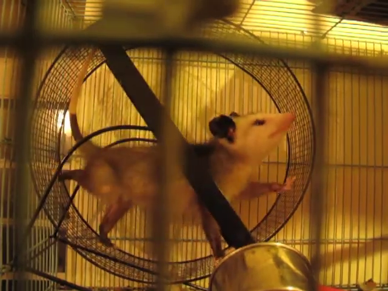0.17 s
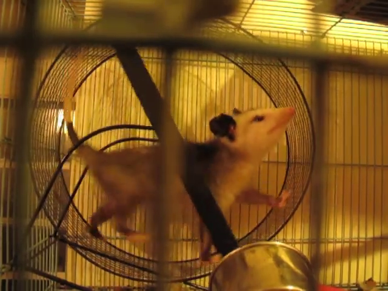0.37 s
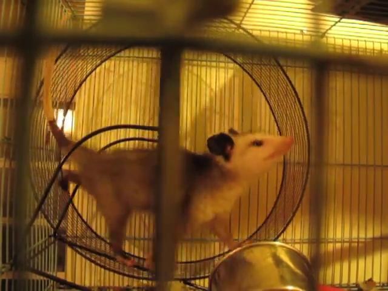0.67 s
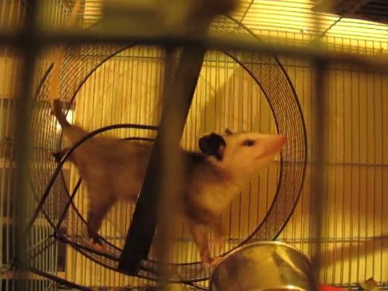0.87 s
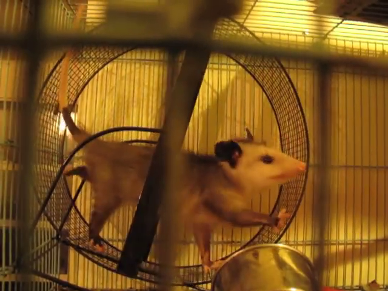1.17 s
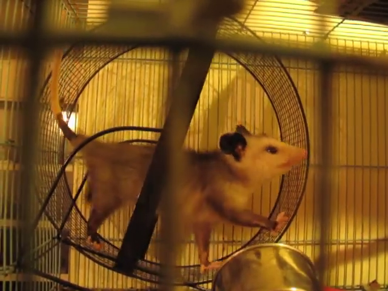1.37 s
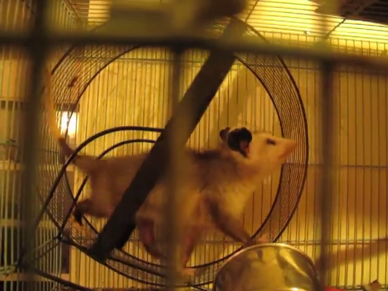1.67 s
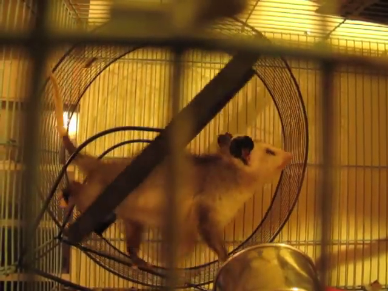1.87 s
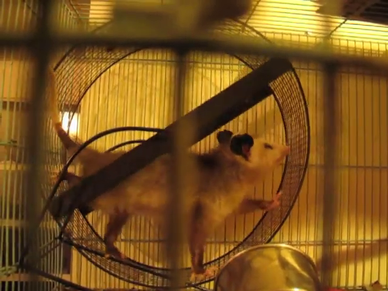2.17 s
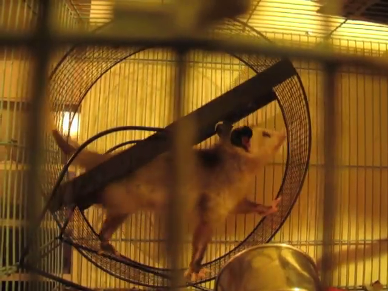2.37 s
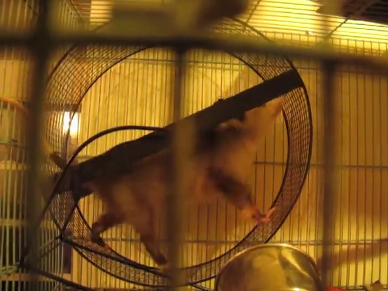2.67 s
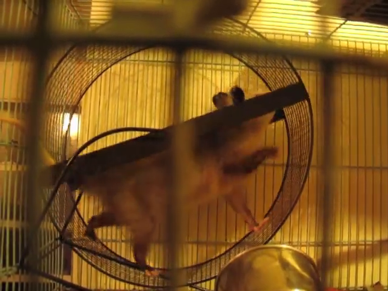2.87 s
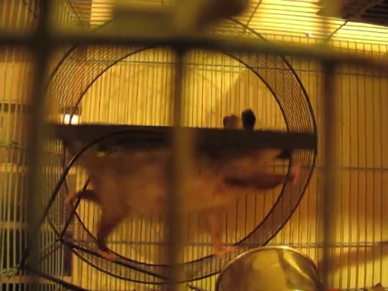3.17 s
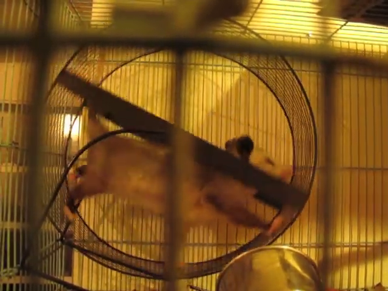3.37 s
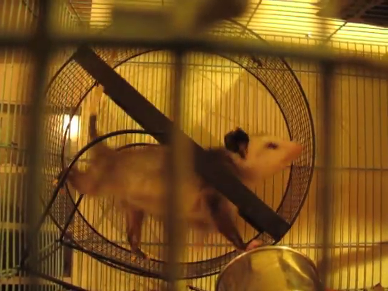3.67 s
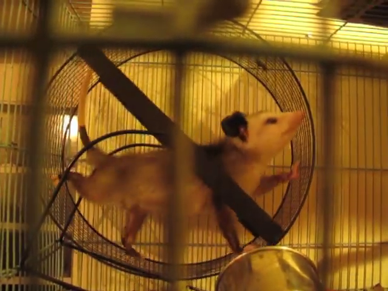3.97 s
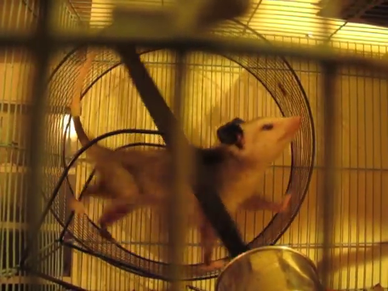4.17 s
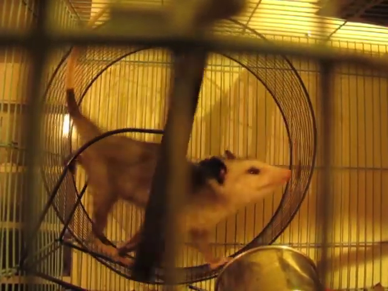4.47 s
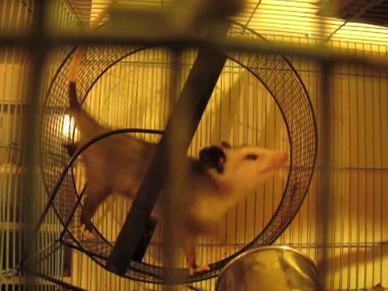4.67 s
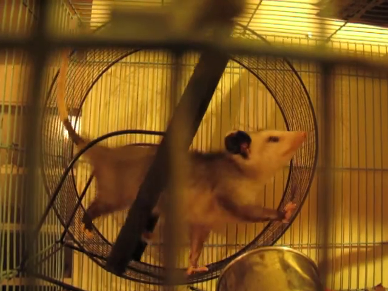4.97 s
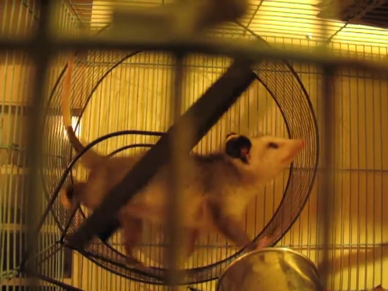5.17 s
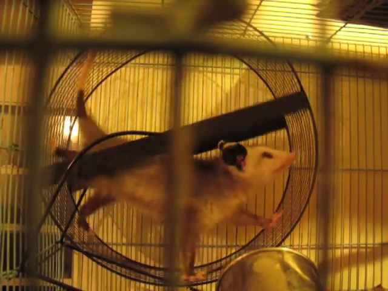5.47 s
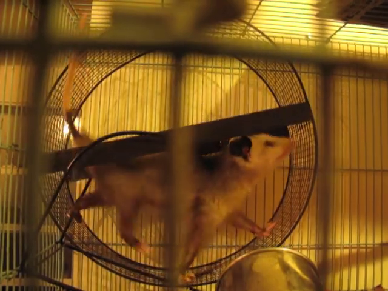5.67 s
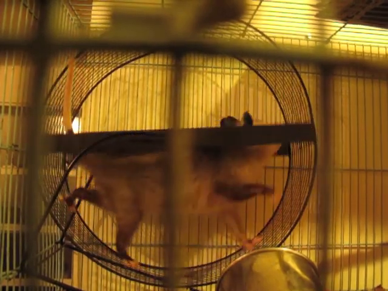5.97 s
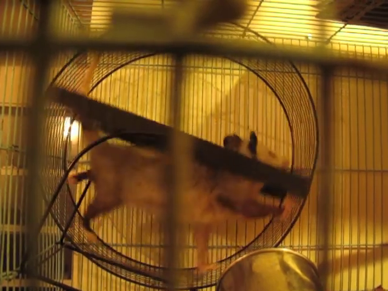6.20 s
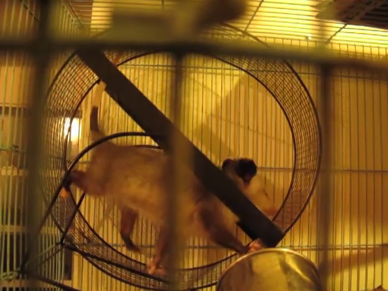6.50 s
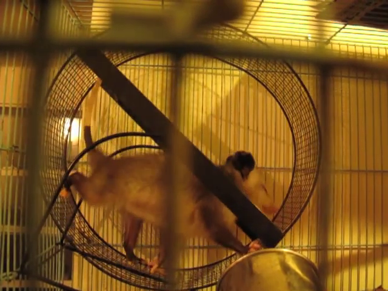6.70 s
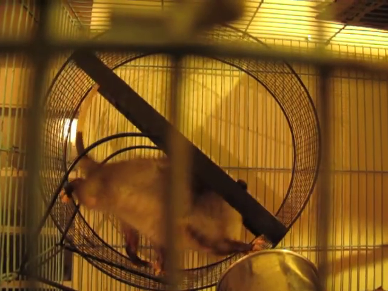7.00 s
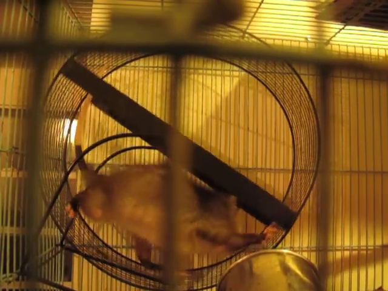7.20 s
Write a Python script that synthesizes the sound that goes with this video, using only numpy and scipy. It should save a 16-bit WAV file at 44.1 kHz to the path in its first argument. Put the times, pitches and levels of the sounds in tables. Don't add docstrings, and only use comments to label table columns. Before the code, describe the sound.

A quiet, close indoor sound of a small animal walking in a wire-mesh wheel, under soft hiss, dull rumble and a thin, slightly fluttering high electronic whine from a cheap camera microphone. At 0.2 s fur brushes the mesh with tiny claw ticks; metallic clicks and jolts follow at 0.5-0.85 s. Light taps quicken from 1.3 s, and from 1.6 to 2.15 s the loose hub chatters in rapid bright knocks. An airy swish passes at 2.3 s, then a hard ringing clank at 2.85 s. Small rattles come at 3.1-3.35 s. Around 4.15-4.5 s the frame rattles while the axle gives a short, falling squeak; a louder, purer high squeak sounds at 5.1-5.25 s. A thin bright knock lands at 5.45 s, soft bumps at 5.9 s, clustered ticks and muffled bumps at 6.15-6.6 s, then near quiet with faint clicks around 7.15 s.

```python
import sys
import numpy as np
from scipy import signal
from scipy.fft import rfft, irfft, next_fast_len
from scipy.io import wavfile
from scipy.ndimage import map_coordinates

SR = 44100
rng = np.random.default_rng(int(sys.argv[2]) if len(sys.argv) > 2 else 0)


def convert_level_to_amplitude(level_db):
    exponent = np.asarray(level_db, float) / 20
    return 10 ** exponent


def inscribe(sig):
    pcm = np.round(np.clip(np.atleast_2d(sig).T, -1, 1) * 32767)
    wavfile.write(sys.argv[1], SR, pcm.astype(np.int16))


N = 323692

# pitch_hz, width_hz, level_db
FRAME_MODES = [(1820, 32.1, -3), (2060, 41.14, -2), (2321.9, 23.16, -3.5), (2644.6, 79, -5),
               (3050, 85.15, -5), (3620.2, 18.4, -1.5), (3919.9, 54.48, -8), (4567, 19.87, -9),
               (4836.6, 69.7, -12), (5472.7, 98, -11), (6496.2, 26.93, -4), (10860, 30, -7.5)]
# pitch_hz, width_hz, level_db
MESH_MODES = [(5907.8, 90, 4.5), (8300, 19, -2), (8273, 52, -3.5), (8530, 46.4, 8), (8553.5, 112.8, 2.5),
              (9861, 57, 10.5), (10982, 40, -1.5)]
# time_s, level_db, octave_db
GLIDE_LEVELS = [(4.362, -85, -95.5), (4.3745, -43, -72), (4.3785, -53.5, -66.5), (4.383, -47, -64),
                (4.4, -57, -62.5), (4.455, -61, -69.5), (4.474, -47.5, -63.5), (4.495, -53, -62.5),
                (4.53, -76, -80)]


def unit(x):
    return x / np.sqrt(np.mean(x ** 2) + 1e-20)


def along(points, hz):
    f, v = np.transpose(points)
    return np.interp(np.log(hz + 1), np.log(f + 1), v)


def curves(rows):
    s, *cols = np.transpose(rows)
    return [np.interp(np.arange(N) / SR, s, c) for c in cols]


def wobble(rate_hz):
    knots = rng.standard_normal(int(N * rate_hz / SR) + 4)
    return map_coordinates(knots, [np.arange(N) * rate_hz / SR])


def filtered(x, response):
    m = next_fast_len(N + SR // 2)
    return irfft(rfft(x, m) * response(np.fft.rfftfreq(m, 1 / SR)), m)[:N]


def coloured(x, spectrum):
    return filtered(x, lambda hz: convert_level_to_amplitude(along(spectrum, hz)))


def modes(table):
    def response(f):
        total = 0
        for k, (hz, width, db) in enumerate(table):
            damping = 1j * f * width
            total = total + (-1) ** k * convert_level_to_amplitude(db) * damping / (hz * hz - f * f + damping)
        return total
    return response


def ring(t, hz, t60):
    return np.sin(2 * np.pi * hz * t) * convert_level_to_amplitude(-60 * t / t60)


def bell(t, center_s, half_width_s):
    return np.exp(-.5 * ((t - center_s) / half_width_s) ** 2)


def grit(rate_hz, spread_db, t60):
    sizes = (rng.random(N) < rate_hz / SR) * convert_level_to_amplitude(spread_db * rng.exponential(size=N))
    life = convert_level_to_amplitude(-60 * np.arange(SR // 20) / SR / t60)
    return unit(signal.fftconvolve(sizes, life)[:N] * rng.standard_normal(N))


def bursts(times_s, levels_db, t60, tail_db, tail_t60):
    hits, t = np.zeros(N), np.arange(SR // 5) / SR
    hits[np.round(times_s * SR).astype(int)] = convert_level_to_amplitude(levels_db)
    life = convert_level_to_amplitude(-60 * t / t60) + convert_level_to_amplitude(tail_db - 60 * t / tail_t60)
    return 0.593 * hits + signal.fftconvolve(hits, life)[:N] * rng.standard_normal(N)


def gestures(rows, rest_db):
    t = np.arange(0, N / SR + .01, .002)
    s, db, rise, fall = np.transpose(rows)[:, :, None]
    drop_db = 10 * np.where(t < s, (s - t) / abs(rise), (t - s) / abs(fall))
    level_db = (db - drop_db).max(axis=0)
    return np.interp(np.arange(N) / SR, t, np.maximum(level_db, rest_db))


def ringing_parts(rows, puff_share):
    out, t = np.zeros(N + SR), np.arange(SR // 3) / SR
    onset = 1 - np.exp(-t / 0.000555)
    for s, db, hz, t60 in rows:
        puff = rng.standard_normal(len(t)) * convert_level_to_amplitude(-60 * t / t60)
        body = signal.lfilter(*signal.iirpeak(hz, 1.782 + hz / 1500, SR), puff)
        out[round(s * SR):][:len(t)] += convert_level_to_amplitude(db) * (ring(t, hz, t60) + puff_share * body) * onset
    return out[:N]


def air():
    # pitch_hz, level_db_per_hz
    hiss_spectrum = [(20, 1.5), (100, 0), (300, -3.5), (1000, -7.5), (2000, -11), (4000, -12),
                     (6000, -14.5), (8000, -15), (10500, -19.5), (12500, -23), (16000, -23)]
    return convert_level_to_amplitude(-67) * unit(coloured(rng.standard_normal(N), hiss_spectrum))


def whine():
    whine_hz, frame_rate_hz = 5880, 30
    t = np.arange(N) / SR
    since = (t * frame_rate_hz - 685 / 1470 + .5) % 1 - .5
    gap = bell(since, 0, 0.01578)
    slip_rad = -.6 * gap + 0.098 * ((since % 1) - .5) + 0.172 * bell(since, .055, 0.022)
    return convert_level_to_amplitude(-53.0) * (1 - 0.5726 * gap) * np.cos(2 * np.pi * whine_hz * t + slip_rad)


def rumble():
    # time_s, level_db
    rumble_levels = [(0.0, -66.5), (.69, -63.5), (1.53, -64), (1.94, -58.5), (2.33, -66), (2.72, -69),
                     (3.21, -66.5), (3.37, -61.5), (3.78, -72.5), (4.37, -61), (4.6, -67.5), (5.29, -73),
                     (5.54, -64.5), (5.7, -71), (6.13, -69), (6.4, -64.5), (6.6, -73), (7.34, -73)]
    # pitch_hz, level_db_per_hz
    stand_spectrum = [(40, -16.5), (150, -18.5), (400, -8.5), (700, -5), (1000, -1), (1300, -4), (1700, -9),
                      (2600, -14.5), (5000, -81)]
    level_db, = curves(rumble_levels)
    noise = unit(coloured(rng.standard_normal(N), stand_spectrum))
    return convert_level_to_amplitude(level_db - 1 + 1.0637 * wobble(20)) * noise


def scuffs():
    # peak_s, peak_db, rise_s_per_10db, fall_s_per_10db
    scuff_rows = [(.25, -68.5, -0.0862, 0.2419), (.4, -69.5, 0.5622, 0.0364), (.54, -64, 0.0992, 0.5821),
                  (1.45, -65.5, 0, 0.2621), (1.75, -59.5, 0.032, 0.0456), (1.88, -54, 0.079, 0.0351),
                  (1.935, -57, -0.1034, -0.0172), (2.0, -63, 0, 0.2224), (2.11, -59.5, -0.0689, 0.0051),
                  (2.87, -69, 0.36, 1), (3.15, -71, 0.6709, 0.0058), (3.31, -63.5, 0.06, 0.0108),
                  (3.34, -68, 0.8855, 0.3162), (4.2, -65, 0, 0.6359), (4.4, -58, 0.0884, -0.077),
                  (4.575, -61.5, .5, -0.0517), (5.155, -56, 0.0223, 0.0061), (5.26, -69.5, 0.7142, 0.2029),
                  (5.39, -55.5, 0.0007, 0.0046), (5.46, -53.5, -0.0314, 0.0097),
                  (6.23, -64, 0.5789, 0.2418), (6.4, -60, 0.072, 0.1177), (6.97, -71, 0.3988, 0.4649)]
    # pitch_hz, level_db_per_hz
    scuff_spectrum = [(2000, -57), (4000, -17), (6500, -7), (8000, -2), (9300, 1.5), (10800, -7.5),
                      (12500, -14), (16000, -28)]
    level_db = gestures(scuff_rows, rest_db=-76.5)
    grains = grit(700, spread_db=2.5, t60=0.03787)
    sound = unit(coloured(grains, scuff_spectrum)) + .5 * unit(filtered(grains, modes(MESH_MODES)))
    return convert_level_to_amplitude(level_db - 3.5) * sound


def turning_wheel():
    # peak_s, peak_db, rise_s_per_10db, fall_s_per_10db
    stride_rows = [(.2, -68, 0.8158, 0.269), (.55, -64, -1.4523, 0.5188), (1.2, -70.5, 5.5, 3),
                   (1.45, -67, -0.5, -0.9663), (1.75, -59, -0.0078, 0.22), (1.88, -58, -0.6961, 0.1423),
                   (2.0, -57, -0.003, 0.2584), (2.11, -55.5, 0.484, 0.1057), (2.9, -69, 0.67, 1.9985),
                   (3.24, -61, 0.0582, 0.15), (3.33, -59, 0.2149, 0.1627), (3.42, -61.5, 0.0729, 0.0211),
                   (4.15, -60, 0.0329, 0.624), (4.4, -61, 0.2859, 0.2267), (4.5, -59, .5, -0.2189),
                   (5.4, -64.5, 0.1423, 0.3164), (6.23, -66.5, 0.5931, 0.2459), (6.4, -61, 0.1344, 0.1129)]
    # pitch_hz, width_hz, level_db
    roll_modes = [(135.82, 29.96, -3), (245.33, 42.04, 1.5), (386.02, 37.58, -1.5)]
    level_db = gestures(stride_rows, rest_db=-78.5)
    shakes = convert_level_to_amplitude(level_db - 3.5) * grit(1500, spread_db=3.0, t60=0.046)
    rattle = convert_level_to_amplitude(14.5) * filtered(shakes, modes(FRAME_MODES))
    rattle += convert_level_to_amplitude(2.0) * coloured(shakes, [(500, -29), (900, -7), (1700, 3.5), (5000, -7.5), (8000, -21)])
    roll = convert_level_to_amplitude(level_db - 8) * unit(filtered(rng.standard_normal(N), modes(roll_modes)))
    return rattle + roll


def swishes():
    # peak_s, peak_db, rise_s_per_10db, fall_s_per_10db
    swish_rows = [(.122, -68, 0.15, 0.0762), (.185, -52.5, -0.0176, 0.0347), (.215, -58.5, -0.0214, 0.0211),
                  (1.2, -65.5, 0.0562, 0.2004), (2.27, -54, -0.0045, 0.0842), (2.3, -50, 0.0284, 0.0465),
                  (2.335, -54.5, 0.0193, 0.0269), (2.395, -67, -0.1034, 0.1587),
                  (3.22, -69.5, 0.1627, 0.1523), (3.288, -57, 0.0287, 0.0351), (4.05, -58.5, -0.019, 0.103),
                  (4.074, -54, -0.0161, 0.0369), (5.49, -58, 0.0307, 0.033), (6.188, -62.5, 0.0479, 0.0195),
                  (6.4, -67, 0.0503, 0.1165)]
    # pitch_hz, level_db_per_hz
    swish_spectrum = [(2500, -38.5), (4000, -13), (6500, -11), (9000, 2), (10800, -1.5), (12500, -9),
                      (14000, -13), (16000, -17.5)]
    # pitch_hz, width_hz, level_db
    swept_modes = [(7517, 61.26, -5.5), (8505, 50, 4), (10860, 35, -4), (12270, 50, -3.5),
                   (13460, 50, -13.5)]
    fur = grit(3000, spread_db=1.0, t60=.012)
    sound = unit(coloured(fur, swish_spectrum)) + 0.428 * unit(filtered(fur, modes(swept_modes)))
    return convert_level_to_amplitude(gestures(swish_rows, -110)) * sound


def claws():
    # start_s, peak_db, top_edge_db (re peak)
    claw_rows = [(.189, -53, -19), (.2119, -55, -22), (0.835, -58.5, -23.5), (1.1916, -60, -12),
                 (2.269, -49, -17.5), (2.296, -46, -19), (2.317, -52.5, -17.5), (2.3865, -62.5, -23),
                 (2.472, -58, -21.5), (2.7017, -59.5, -19), (2.7806, -60, -20), (2.8505, -39, -10),
                 (3.2129, -58, -20), (3.2834, -50.5, -20), (3.744, -58.5, -20), (4.0456, -59, -15.5),
                 (5.4458, -37, -22), (0.8479, -50.5, -25), (.524, -48.5, -25), (4.3536, -62, -14),
                 (4.3802, -55.5, -14), (4.5387, -60.5, -23.5), (4.555, -54, -24), (5.2421, -62, -17),
                 (5.3517, -52, -23), (5.733, -53, -17.5), (6.2319, -53, -24.5), (6.1437, -58.5, -23),
                 (6.2065, -57, -22), (6.333, -56, -21.5), (6.3671, -56.5, -24), (6.28, -62.5, -22),
                 (6.292, -61, -23), (6.304, -63.5, -23), (6.161, -61, -22), (7.1435, -55.5, -22),
                 (7.1977, -59.5, -17)]
    # pitch_hz, level_db_per_hz
    tick_spectrum = [(500, -38), (2500, -23.5), (5000, 0.5), (7000, 1), (9000, 1.5), (10500, -0.5),
                     (12000, -5.5), (16000, -34.5)]
    s, db, top_db = np.transpose(claw_rows)
    crack = bursts(s, db, t60=0.02935, tail_db=-10.5, tail_t60=0.1767)
    edge = bursts(s, db + top_db, t60=0.023, tail_db=-20, tail_t60=.12)
    wire = coloured(crack, tick_spectrum) + convert_level_to_amplitude(1.0) * filtered(crack, modes(MESH_MODES))
    return wire + coloured(edge, [(10500, -36.5), (12200, 11.5), (14000, 3), (16000, -10)])


def jolts():
    # start_s, peak_db, dull_crack_db (re peak)
    jolt_rows = [(.5232, -42, -1.5), (0.5855, -38.5, -15.5), (.707, -52, 8), (0.7945, -53.5, 3),
                 (0.8477, -50, 8), (2.474, -47.5, 1.5), (2.8497, -32.5, 3), (3.079, -46.5, -1.1643),
                 (3.136, -48, -6), (3.2221, -59, -1.5), (3.252, -46, 0), (3.2908, -41, -2.5),
                 (3.348, -56, -7), (4.146, -48.5, -10), (4.2882, -43.5, -8.5), (4.339, -52.5, -3),
                 (4.351, -43, -3), (4.399, -41.5, -8), (4.4476, -41.5, -12), (4.49, -42.5, -2),
                 (4.8877, -45, -13.5), (5.3833, -50.5, -7.5), (5.445, -36.5, 2.5), (5.5446, -48.5, 2),
                 (5.862, -57, 7.5), (6.2546, -59.5, -0.5), (6.367, -57, -4), (6.3927, -50.5, 7.5),
                 (6.4009, -49.5, 4.5), (6.4489, -50.5, 3.5), (7.1471, -54, 4)]
    s, db, dull_db = np.transpose(jolt_rows)
    shake = bursts(s, db, t60=0.004275, tail_db=-17.5, tail_t60=0.21674)
    dull = bursts(s, db + dull_db, t60=0.02445, tail_db=1, tail_t60=0.15204)
    broad = coloured(dull, [(800, -16.5), (1700, -8.5), (5500, -7.5), (8500, -25.5)])
    return convert_level_to_amplitude(-5) * broad + convert_level_to_amplitude(13) * filtered(shake, modes(FRAME_MODES))


def paw_bumps():
    # start_s, peak_db, pitch_hz, t60_s
    bump_rows = [(.523, -60, 3050, 0.0937), (.584, -59.5, 2340, 0.177), (.584, -63.5, 2050, 0.0461),
                 (.796, -60.5, 1426, 0.0844), (1.578, -56.5, 1433, 0.0643), (1.994, -52.5, 1113, 0.1284),
                 (6.275, -63, 2159, 0.087), (3.177, -65.5, 1680, 0.0813), (3.218, -59, 2306, 0.0734),
                 (3.254, -54, 1527, 0.04626), (3.29, -59, 1551, 0.188), (4.143, -58.5, 2060, 0.1945),
                 (4.215, -58, 1441, 0.242), (5.352, -56.5, 1439, 0.1622), (5.352, -59, 3410, 0.1621),
                 (5.365, -58, 770.3, 0.407), (5.383, -56, 1321, 0.1199), (5.383, -55.5, 2240, 0.1341),
                 (5.383, -57.5, 3420, 0.1002), (5.862, -53.5, 900, 0.1088), (5.862, -56.5, 580.1, 0.1388),
                 (5.86, -64, 1592, 0.0826), (6.255, -55, 2060, 0.0815), (6.25, -58.5, 712.1, 0.1467),
                 (6.249, -60.5, 1175, 0.0902), (6.366, -58, 574.4, 0.238), (6.366, -57, 818.7, 0.1162),
                 (6.386, -52.5, 599.2, 0.132), (6.411, -53.5, 1020, 0.167), (6.537, -59.5, 577.9, 0.1106), ]
    return ringing_parts(bump_rows, puff_share=3.941)


def frame_rings():
    # start_s, peak_db, pitch_hz, t60_s
    ring_rows = [(.524, -62.5, 2572, 0.0773), (.53, -62, 1877, 0.1249), (.524, -65, 10860, 0.147),
                 (.586, -61.5, 10860, 0.1936), (.586, -55.5, 3040, 0.1156), (.645, -60, 2502, 0.1018),
                 (.645, -63.5, 1903, 0.0985), (3.075, -61, 3507, 0.1002), (3.29, -54.5, 10860, 0.1428),
                 (3.33, -60, 1508, 0.0767), (4.138, -59.5, 751, .1), (4.162, -59.5, 3482, 0.134),
                 (4.168, -60.5, 1558, 0.1013), (4.205, -60.5, 2563, 0.1307), (4.287, -56, 3040, 0.1064),
                 (4.287, -59, 1820, 0.0908), (4.285, -62.5, 4152, 0.068), (4.34, -60, 1820, 0.14),
                 (4.357, -65.5, 3653, 0.1385), (4.4, -59, 2757, 0.1131), (4.445, -62.5, 2550, 0.0763),
                 (4.492, -61.5, 3040, 0.0986), (4.49, -55.5, 1820, 0.1212), (4.565, -62.5, 3040, 0.0946),
                 (5.878, -57.5, 1314, 0.0785), (5.885, -60.5, 397.4, 0.1052), (5.897, -55.5, 578.2, 0.1067),
                 (5.915, -63, 1524, 0.0738), (6.165, -61.5, 1443, 0.0999), (6.25, -61, 1750, 0.0589),
                 (6.252, -64, 2647, 0.0598), (6.335, -66, 1394, 0.065), (6.445, -59, 1449, 0.0959),
                 (6.503, -62, 1002, 0.0698), (6.57, -62, 1101, 0.1169)]
    return ringing_parts(ring_rows, puff_share=1.364)


def claw_taps():
    # start_s, peak_db
    tap_rows = [(0.5839, -49), (.756, -53), (1.296, -54), (1.445, -49.5), (1.5169, -54.5), (1.577, -50.5),
                (1.6305, -51.5), (1.6795, -51.5), (1.932, -53), (2.213, -45.5), (3.0333, -54), (3.146, -50),
                (3.2313, -49.5), (4.1589, -44.5), (4.4865, -54), (5.2638, -52), (5.3816, -46), (1.807, -55),
                (1.889, -47.5), (1.601, -52.5), (1.619, -58), (5.5456, -54), (5.5769, -53), (5.7983, -55),
                (6.0638, -57), (6.2556, -51.5), (6.3372, -53), (6.391, -54), (6.4, -47), (6.449, -48.5)]
    # pitch_hz, level_db_per_hz
    tap_spectrum = [(3000, -41), (6500, -8), (8000, 1), (9500, 3.5), (10800, -8.5), (12000, -17.5),
                    (16000, -39.5)]
    tips = bursts(*np.transpose(tap_rows), t60=0.02341, tail_db=-12, tail_t60=0.1337)
    return coloured(tips, tap_spectrum) + convert_level_to_amplitude(-2.5) * filtered(tips, modes(MESH_MODES))


def chatter():
    # start_s, frame_peak_db, mesh_peak_db
    chatter_rows = [(1.6, -46, -60), (1.6506, -40, -56.5), (1.694, -37, -60), (1.724, -39.5, -47),
                    (1.768, -39, -50), (1.784, -39, -49), (1.826, -36.5, -44.5), (1.867, -34, -39.5),
                    (1.9122, -43.5, -48), (1.966, -44.5, -53), (1.9781, -38.5, -48.5), (1.9914, -33.5, -43),
                    (2.016, -42, -54), (2.0499, -36.5, -52.5), (2.0873, -31, -38.5), (2.118, -43, -58),
                    (2.151, -46.5, -64.5)]
    # pitch_hz, width_hz, level_db
    hub_modes = [(1820, 52.1, -4), (2050, 62.84, -5.5), (2666.2, 84.5, -7), (3040, 57.1, 1.5),
                 (3646.5, 24.22, 0.5), (3904.2, 43.7, -3.5), (4540.8, 38.15, -2.5), (4975.6, 84.8, -3),
                 (6429.9, 45.9, -0.5), (7440, 48.6, -5.5), (8749.7, 45, -5.5), (9175, 60, -5),
                 (10254, 50, -13), (10861, 29.95, 1)]
    # pitch_hz, level_db_per_hz
    thud_spectrum = [(700, -29.5), (1500, -4), (3000, -4), (5500, 1), (7500, -20.5)]
    # pitch_hz, level_db_per_hz
    clatter_spectrum = [(1200, -39.5), (2500, -17.5), (5000, -6.5), (7000, -3.5), (9200, 0.5), (10800, -3),
                        (12500, -16), (16000, -27.5)]
    mesh_lag_s = .0004
    s, frame_db, mesh_db = np.transpose(chatter_rows)
    knock = bursts(s, frame_db, t60=0.00642, tail_db=-17.5, tail_t60=0.1591)
    thud = bursts(s, frame_db, t60=0.0405, tail_db=-6, tail_t60=0.166)
    hiss = bursts(s + mesh_lag_s, mesh_db, t60=0.0415, tail_db=-10, tail_t60=0.1693)
    out = convert_level_to_amplitude(10.0) * filtered(knock, modes(hub_modes))
    out += convert_level_to_amplitude(-16.5) * coloured(thud, thud_spectrum)
    return out + convert_level_to_amplitude(-1.5) * coloured(hiss, clatter_spectrum)


def hard_knocks():
    # (pitch_hz, level_db, t60_s)
    knock_rows = [
        (2.8501, -44.5, [(609.5, -13.5, 0.1706), (1233, -5.5, 0.1538), (1822, -1, 0.0837), (2276, 0.5, 0.0411), (2766, -8.5, 0.137), (3870, -16, 0.1202), (4861, 0, 0.0596), (6007, 4, 0.0599), (6555, -6.5, 0.1691), (8208, -11.5, 0.0987), (10860, 5.5, 0.12675)]),
        (5.4461, -50, [(2319, 0.5, 0.04566), (2777, -14.5, 0.415), (3766, -1, 0.0578), (4584, 7.5, 0.02832), (4910, -12, .08), (6517, -9, 0.3745), (8246, -9, 0.0614), (10860, 1.5, 0.2035), (11080, 16, 0.02998), (12100, -6, .05), (12760, -4.5, 0.0603)]),
    ]
    out, t = np.zeros(N + SR), np.arange(SR // 3) / SR
    for s, db, table in knock_rows:
        struck = sum(convert_level_to_amplitude(level) * ring(t, hz, t60) for hz, level, t60 in table)
        out[round(s * SR):][:len(t)] += convert_level_to_amplitude(db) * struck
    return out[:N]


def gliding_squeak():
    # time_s, slip_rate_hz
    glide_pitch = [(4.365, 6930), (4.383, 7150), (4.397, 6780), (4.408, 6560), (4.435, 6420), (4.452, 6150),
                   (4.466, 5800), (4.49, 5600), (4.54, 5520)]
    # peak_s, peak_db, pitch_hz, half_width_s
    axle_rows = [(4.392, -51.5, 7110, 0.00706), (4.408, -55, 6560, .012), (4.405, -48.5, 6327, 0.00842),
                 (4.424, -44, 6327, 0.01455), (4.455, -55.5, 6327, 0.0112), (4.449, -48.5, 6062, 0.00712),
                 (4.504, -52, 5605, 0.00915), (4.498, -55.5, 5366.4, 0.0099), (4.534, -58, 5605, 0.00609)]
    t = np.arange(N) / SR
    (hz,), (db, octave_db) = curves(glide_pitch), curves(GLIDE_LEVELS)
    turn_rad = 2 * np.pi * np.cumsum(hz + 60 * wobble(400)) / SR
    sliding = (t > GLIDE_LEVELS[0][0]) & (t < GLIDE_LEVELS[-1][0])
    slip = convert_level_to_amplitude(2.794 * wobble(300)) * sliding
    octave = convert_level_to_amplitude(octave_db + 2.1 * wobble(600)) * np.sin(2 * turn_rad + 1.1 * wobble(1200))
    glide = slip * (convert_level_to_amplitude(db) * np.sin(turn_rad) + octave)
    echo = rng.standard_normal(SR // 10) * convert_level_to_amplitude(-60 * t[:SR // 10] / 0.0899)
    glide = glide + convert_level_to_amplitude(-28) * signal.fftconvolve(glide, echo)[:N]
    for s, peak_db, mode_hz, width_s in axle_rows:
        glide += convert_level_to_amplitude(peak_db) * bell(t, s, width_s) * np.sin(2 * np.pi * mode_hz * (t - s))
    return glide


def locked_squeak():
    # peak_s, peak_db, half_width_s
    swell_rows = [(4.389, -38.5, 0.00629), (4.402, -40, 0.00858), (4.418, -36.5, 0.01382),
                  (4.442, -43.5, 0.01765), (5.105, -61, 0.01198), (5.134, -28, 0.009436),
                  (5.163, -25, 0.010502), (5.19, -33.5, 0.00543), (5.202, -31.5, 0.007083),
                  (5.218, -32.5, 0.00947), (5.243, -40.5, 0.005396), (5.263, -53.5, 0.00611),
                  (5.3, -58.5, 0.02486)]
    # time_s, pitch_hz
    lock_pitch = [(4.38, 6830), (4.5, 6825), (5.09, 6845), (5.17, 6851), (5.2, 6840), (5.235, 6830),
                  (5.3, 6842)]
    # time_s, phase_cycles
    regrip_rows = [
        (5.183, 0.3297),
        (5.235, .49),
    ]
    catch_s, octave_fade_db_per_s = 4.3875, 40
    t = np.arange(N) / SR
    swell = 0
    for s, db, width_s in swell_rows:
        cycles = sum(part for at, part in regrip_rows if s > at)
        swell = swell + convert_level_to_amplitude(db) * np.exp(2j * np.pi * cycles) * bell(t, s, width_s)
    swell = swell * np.clip((t - catch_s) / .0012, 0, 1)
    locked = swell * np.exp(2j * np.pi * np.cumsum(curves(lock_pitch)[0]) / SR)
    octave = locked ** 2 / (np.abs(locked) + 0.0114) * (t > GLIDE_LEVELS[-1][0])
    octave = octave * convert_level_to_amplitude(-octave_fade_db_per_s * (t - swell_rows[6][0]) + 1.502 * wobble(90))
    return locked.real + convert_level_to_amplitude(-24.5) * octave.real


def scene():
    background = air() + rumble()
    brushing = scuffs() + swishes()
    wire = claws() + claw_taps()
    wheel = turning_wheel() + jolts() + frame_rings() + chatter() + hard_knocks()
    axle = gliding_squeak() + locked_squeak()
    return (background + brushing + wire + wheel + paw_bumps() + axle)[None]


def roll_off(x):
    return signal.sosfilt(signal.butter(12, 16340, fs=SR, output="sos"), x)


def record(dry):
    notch_hz, top_hz = 11760, 15800

    def microphone(hz):
        off = (hz - notch_hz) ** 2
        notch = np.sqrt((off + 60 ** 2) / (off + 650 ** 2))
        return notch * np.where(hz < top_hz, 1, .03)

    mix = filtered(dry[0], microphone) + whine()
    return roll_off(mix[None])


dry = scene()
out = record(dry)
inscribe(out)
```